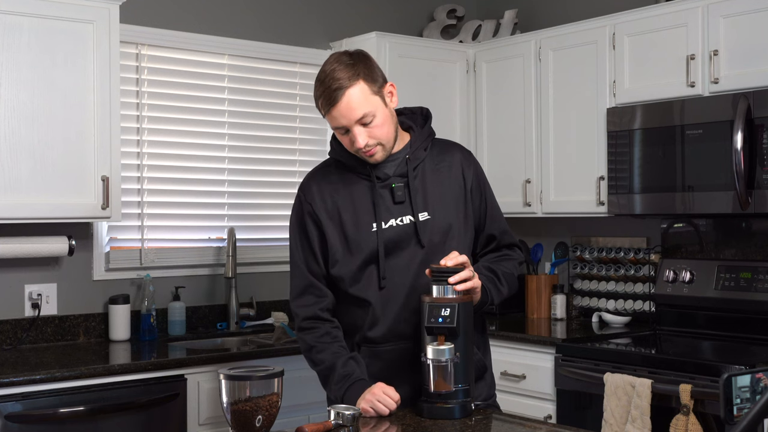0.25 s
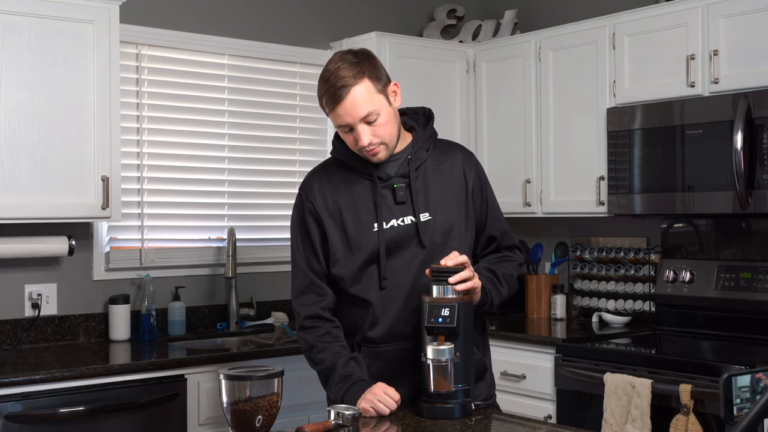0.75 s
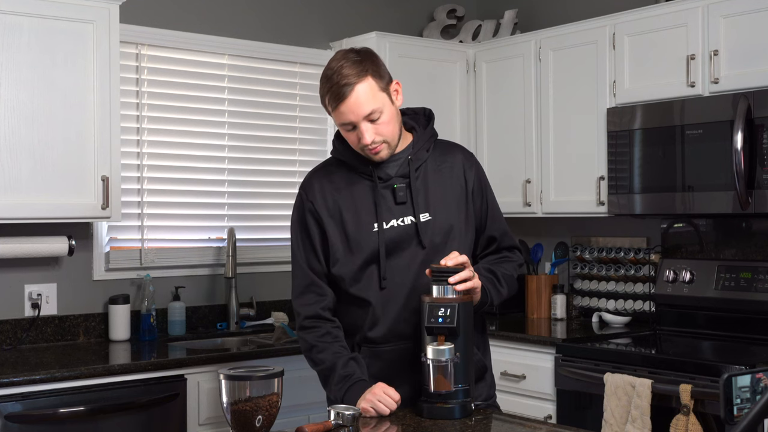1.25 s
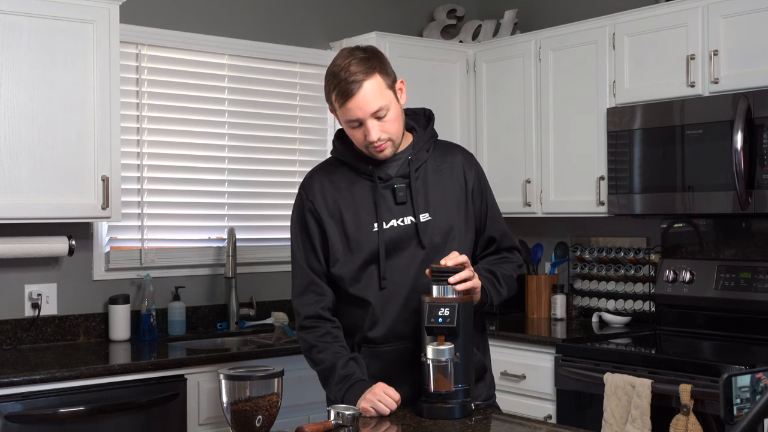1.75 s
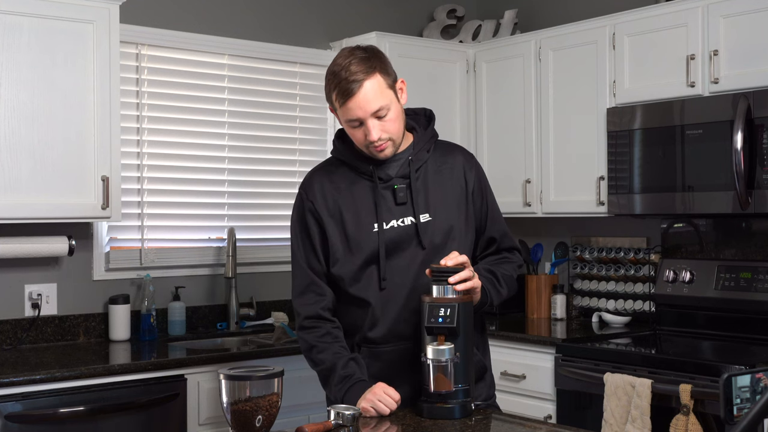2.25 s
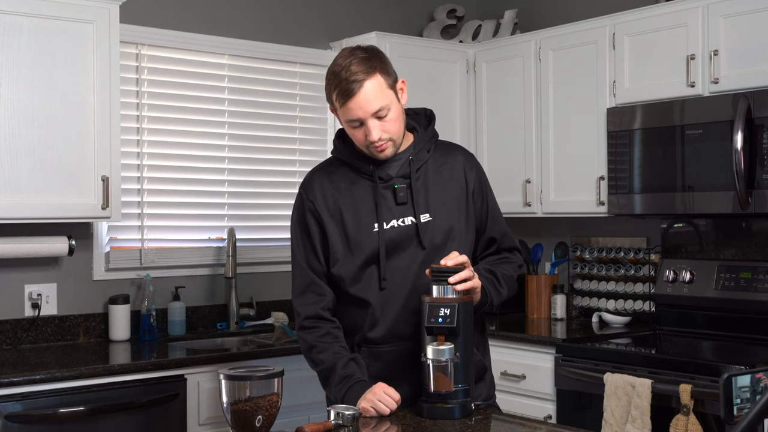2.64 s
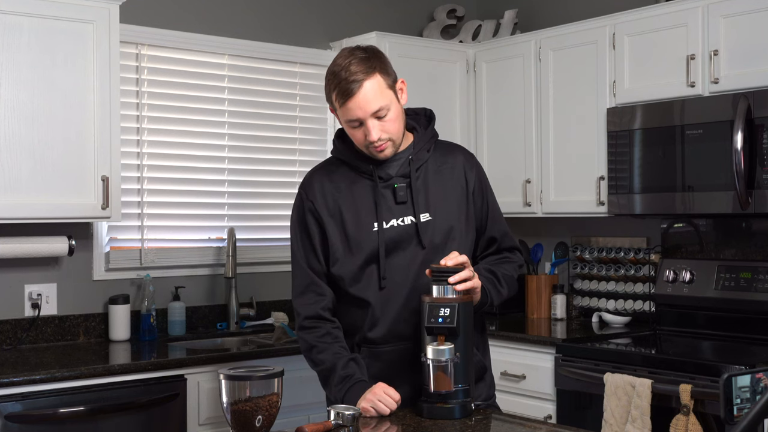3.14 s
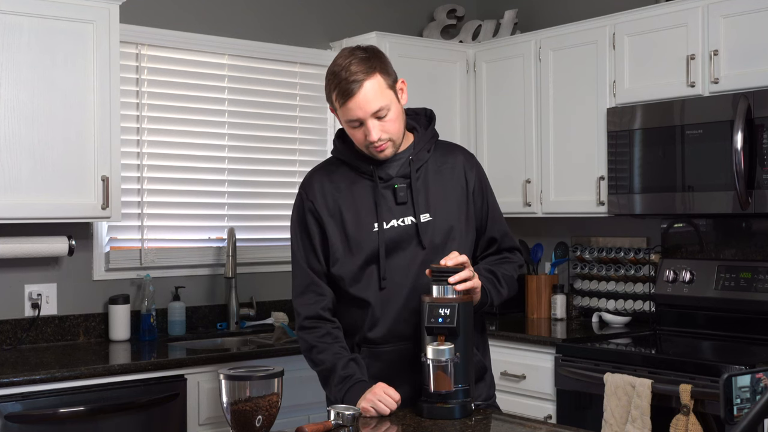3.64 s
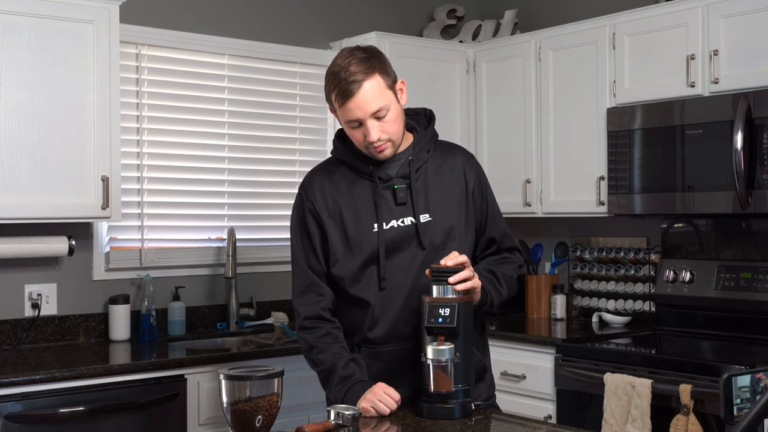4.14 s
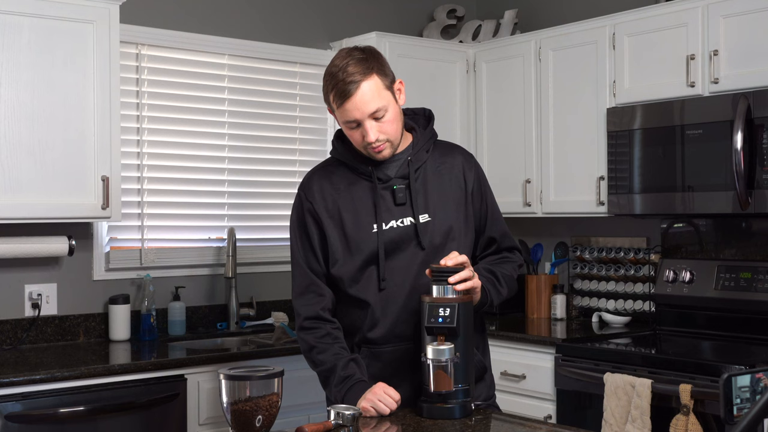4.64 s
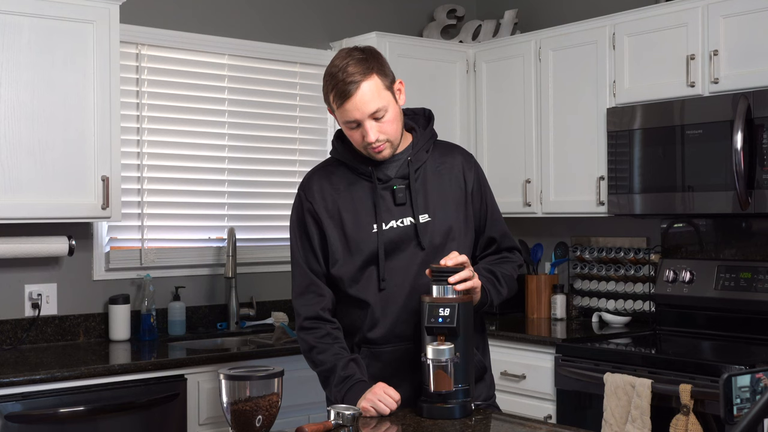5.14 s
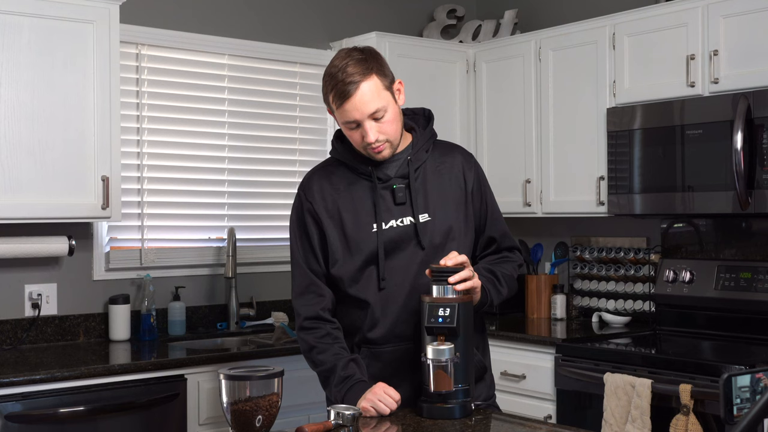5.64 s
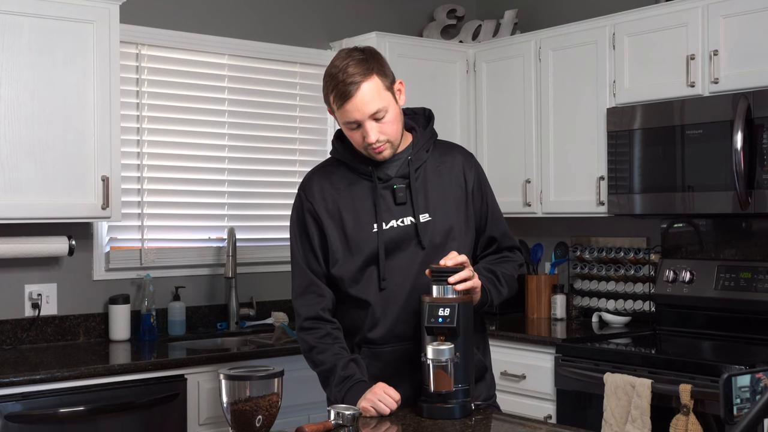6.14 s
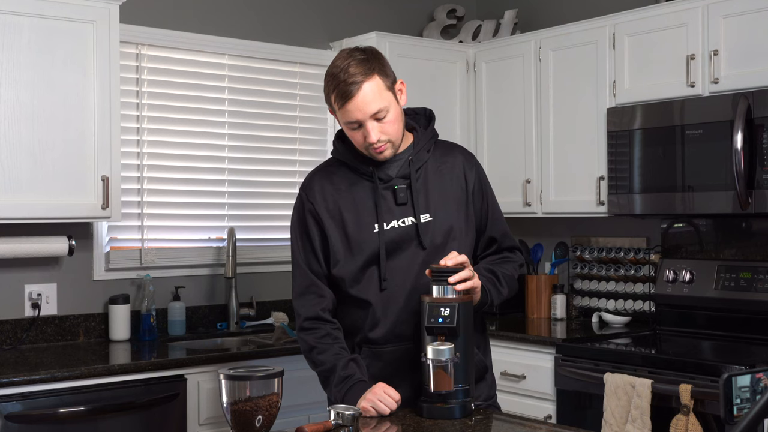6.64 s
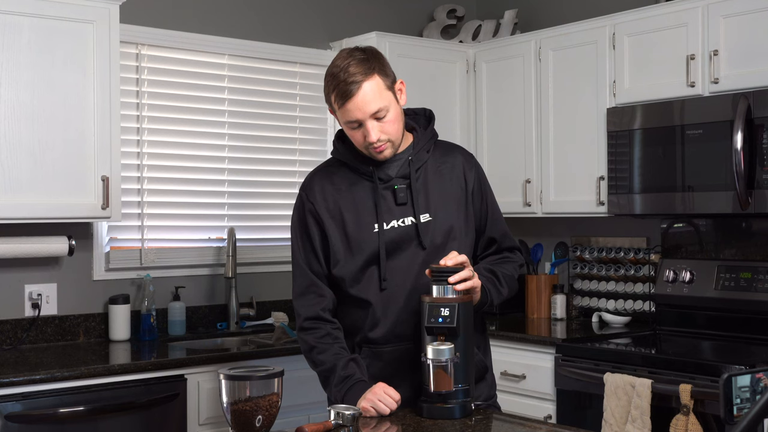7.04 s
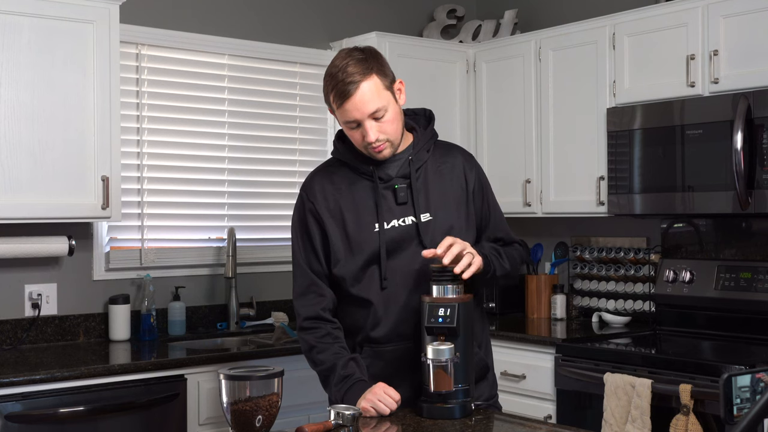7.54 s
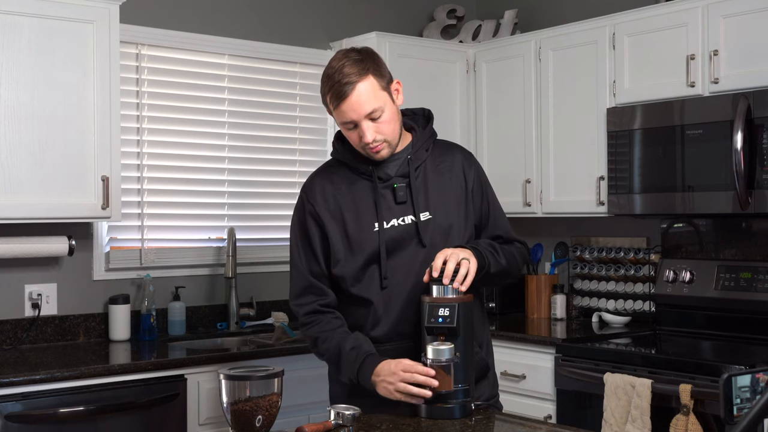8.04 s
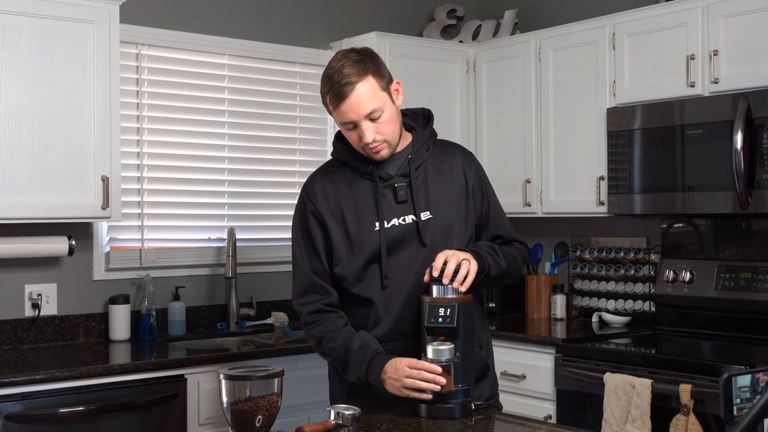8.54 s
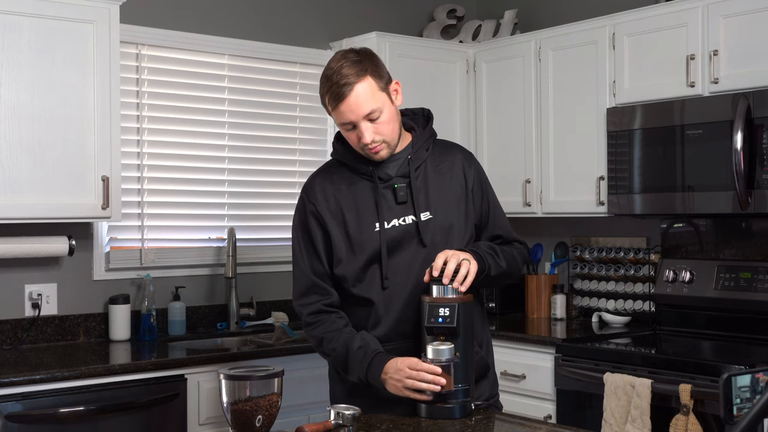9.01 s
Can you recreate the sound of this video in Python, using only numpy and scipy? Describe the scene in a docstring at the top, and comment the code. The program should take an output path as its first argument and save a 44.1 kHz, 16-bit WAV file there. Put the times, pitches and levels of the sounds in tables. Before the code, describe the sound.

Loud, gritty coffee grinding with a wavering gear squeal fades over several seconds into soft motor hum and pattering grounds, ending with a shaken cup.

```python
"""On a kitchen counter, an electric burr grinder chews its last beans and its motor speeds up as the grind thins;
late on, several layers dip in level while the motor runs on, and at the end a hand shakes the catch cup. Beans
crunch as shaped noise bursts and snap as ringing puffs; the gear squeals under load, loudest once a gear turn,
as a wavering tone with noisy side whistles. The motor hums in sines split by the mains ripple. Grounds patter
in the cup as noise bursts, and the room adds a tail."""
import sys
import numpy as np
from scipy import signal
from scipy.io import wavfile
from scipy.ndimage import uniform_filter1d

SR = 44100
rng = np.random.default_rng(int(sys.argv[2]) if len(sys.argv) > 2 else 0)


def inscribe(sig):
    """Save sig as 16-bit PCM at rate SR to the path in sys.argv[1].

    A 1-D sig is mono; a 2-D sig holds one channel per row.
    Samples are clipped to [-1, 1] before scaling.
    """
    pcm = np.round(np.clip(np.atleast_2d(sig).T, -1, 1) * 32767)
    wavfile.write(sys.argv[1], SR, pcm.astype(np.int16))


N = 409136
T = np.arange(N) / SR

# The grind thins as the hopper empties:
# (time [s], squeal [dB], depth of its throb [dB], crunch [dB], chute knocking [dB], fizz [dB])
GRIND = [(0.0, -29.5, 4, -24.5, -36, -42.5), (0.6, -29.5, -0.5, -25.5, -30.5, -46.5),
         (1.2, -28, 1, -26.5, -32, -51.5), (1.7, -30, 6, -29, -31, -58.5),
         (2.1, -31, 9.5, -31, -29.5, -60.5), (2.5, -25.5, 2.5, -32.5, -36.5, -60.5),
         (2.85, -34, 5, -38, -37.5, -61.5), (3.3, -28.5, 7, -39, -43, -62.5),
         (3.6, -32.5, 5.5, -41.5, -44.5, -63.5), (3.95, -39.5, 1, -40.5, -41, -63),
         (4.4, -44, 4, -43, -53, -66), (4.8, -44.5, 8, -45.5, -59, -69), (5.1, -51.5, 5.5, -50, -63, -76),
         (5.5, -45.5, 3.5, -47, -66, -70), (5.9, -55, 11, -56.5, -55, -72),
         (6.2, -53.5, 2, -55.5, -70, -79), (7.0, -58.5, 22, -51, -72, -83)]
# Beans that catch in the burrs and load the gear:
# (time [s], length [s], rise of squeal [dB], rise of crunch [dB], rise of knocking [dB])
BITES = [(0.03, 0.16, 7.5, 1, 9), (0.17, 0.12, 3.5, -1, 5), (0.34, 0.14, 4, -1.5, 4.5),
         (0.54, 0.2, 3.5, 0.5, -2.5), (0.93, 0.018, 8, 1, 4), (1.07, 0.18, 3.5, 0, 2),
         (1.29, 0.16, 6, 0, 1), (1.44, 0.059, 7, -1, -4), (1.54, 0.14, 3.5, 0, 3.5),
         (1.72, 0.24, 4.5, 1.5, 0), (1.9, 0.39, 3, 1, 0), (2.16, 0.079, 6, 2.5, -4.5),
         (2.29, 0.098, -0.5, 1, -3), (2.45, 0.17, 4, -0.5, 3.5), (2.557, 0.013, 4.5, 0, -4),
         (2.62, 0.22, 4.5, -1.5, 2), (2.78, 0.24, 7.5, 1, 4.5), (2.9, 0.095, 4, 3.5, 8),
         (3.03, 0.023, 10, 3, 6), (3.075, 0.017, 4, -1, 1), (3.17, 0.26, 5, 3, 7.5), (3.225, .04, 7, -4, 5),
         (3.31, .025, 3.5, -1.5, 0), (3.345, .03, -3.5, 1, 2), (3.38, 0.21, 3.5, 4.5, 8),
         (3.4, 0.068, 4.5, 0, 1), (3.52, 0.04, 2.5, 3, -7), (3.62, 0.12, 6, 7, 12.5),
         (3.72, 0.2, 10, 3.5, 9), (3.85, 0.28, 10.5, 0.5, 3.5), (3.997, 0.022, 5.5, 4, 1),
         (4.02, 0.17, 3.5, 1.5, -3), (4.035, 0.027, 9, 6, 3), (4.23, 0.048, 5, 1, -8),
         (4.31, 0.22, 7, -1, 7.5), (4.313, .016, 3.5, 1, -1), (4.47, 0.14, 3.5, 5, -4),
         (4.62, 0.33, 7.5, 4.5, 8), (4.92, .12, 3.5, 3, 12), (5.14, 0.16, 5.5, 3.5, 11),
         (5.34, 0.083, -6, 4.5, 18), (5.43, 0.053, 0, 3, 12), (5.77, 0.045, 11.5, 3, -7),
         (5.84, 0.047, 2, 9, -2), (5.91, 0.12, 10, -8, 7), (6.0, 0.049, 21.5, 13, 4),
         (6.08, 0.17, 7.5, 9, 13), (6.37, 0.11, 3.5, 4, 6), (6.53, 0.053, 17.5, -7, -3)]
CRACK_RISE = 0.31  # share of its length in which a bean's crunch and knocking rise
FIZZ_PER_CRUNCH = 0.79  # dB of fizz for each dB that a bean adds to the crunch
# Crunch spectrum: (frequency [Hz], level [dB])
CRUNCH_SPECTRUM = [(35, -60.5), (70, -57.5), (250, -34), (489, -16), (595, -12), (752, -9), (863, -16.5),
                   (1057, -16), (1410, -10), (2350, -18.5), (3090, 3.5), (3540, -17), (4200, -19),
                   (4750, -15), (5340, -47), (6500, -48.5), (8450, -70.5), (14300, -120)]
# Resonances of the housing: (frequency [Hz], width [Hz], lift [dB])
HOUSING_MODES = [(589.4, 38, 9.5), (621, 31, 10), (757.6, 62, 11), (832, 40, -6), (1377, 17, 9),
                 (1710, 25, -1), (1920, 61, 3), (1060, 18, 6), (1277, 51, 4.5), (1430, 26, 6.5),
                 (2045, 180, 7.5)]
# Resonances of the chute: (frequency [Hz], width [Hz], level [dB])
CHUTE_MODES = [(2840, 180, -7.5), (2982, 275, 8), (3460, 240, -2.5)]
# Spectrum of the fine splinters: (frequency [Hz], level [dB])
FIZZ_SPECTRUM = [(2940, -43.5), (5000, -6), (5150, -21.5), (5350, -12.5), (6190, -3.5), (7200, -9),
                 (8020, -19.5), (9190, -5), (9690, -14.5), (10400, -24), (11900, -11), (13400, -17),
                 (14800, -7.5), (15200, -10.5), (16000, -25)]
# Short snaps near 3 kHz, and one faint narrow tick near 5.8 kHz late on: (time [s], peak [dB], ring [Hz])
SNAPS = [(0.1331, -21, 3050), (0.45, -13, 2970), (0.902, -27.5, 2850), (1.021, -13.5, 3080),
         (1.087, -29, 2880), (1.3778, -17, 2910), (2.0785, -18, 3060), (2.1192, -15.5, 3150),
         (2.176, -26, 2950), (2.2797, -12, 2950), (2.3208, -15, 3130), (2.4184, -28, 2900),
         (2.455, -22, 2920), (2.5287, -30.5, 2990), (2.552, -22, 3200), (2.599, -16.5, 2900),
         (2.7227, -24, 2830), (2.8, -16.5, 3000), (2.9008, -16, 3160), (2.9991, -23, 2850),
         (3.1115, -31, 2980), (3.432, -28, 2840), (3.2323, -20, 3060), (3.3332, -35, 3000),
         (3.391, -20, 2960), (3.514, -21, 3210), (3.5886, -26, 2980), (3.707, -35, 2700),
         (3.951, -27, 2760), (4.31, -31, 3080), (4.9665, -26.5, 2940), (5.4222, -30, 2980),
         (5.9746, -27.5, 2810), (6.0833, -33, 2820), (8.9813, -60, 5770)]
# Splinters that tick high: (time [s], peak [dB], centre [Hz])
TICKS = [(0.8984, -41, 14800), (1.1633, -46, 8900), (1.3803, -35, 15200), (1.6062, -57, 13800),
         (1.6516, -48, 13800), (1.8966, -50, 14600), (1.9435, -49, 14300), (2.1924, -57, 8100),
         (2.4668, -51, 9200), (2.5975, -54, 13700), (3.2306, -53, 9100), (3.3353, -43, 15200),
         (3.8417, -52, 9100), (4.0178, -54, 13900), (4.0946, -58, 8310), (4.4099, -61, 8130),
         (4.4752, -52, 9050), (5.1158, -57, 11600), (5.3308, -58, 8680), (5.4121, -66, 9010),
         (5.8356, -66, 14700), (5.9888, -60, 11700), (6.2447, -78, 14100), (6.4113, -67, 8870),
         (6.4981, -69, 9370), (6.8364, -56, 8160), (7.0723, -53, 8150), (7.2205, -56, 8050),
         (7.3587, -54, 8100), (7.6211, -63, 8170), (7.7962, -62, 12200), (8.1294, -72, 8340)]
# Beans that thud against the housing: (time [s], peak [dB], ring [Hz])
THUDS = [(0.069, -23, 764), (0.278, -26.5, 750), (0.546, -26, 606), (0.618, -28, 750), (0.679, -27.5, 600),
         (1.032, -25.5, 725), (1.121, -25.5, 664), (1.184, -24, 750), (1.383, -24, 1380),
         (1.464, -18.5, 720), (1.585, -24.5, 1605), (1.691, -25, 727), (1.805, -28, 614),
         (1.84, -26.5, 740), (1.873, -31, 740), (2.019, -26.5, 640), (2.045, -28.5, 644),
         (2.119, -28.5, 633), (2.187, -30.5, 1570), (2.427, -30.5, 751), (2.551, -33, 744),
         (2.701, -35.5, 724), (2.841, -31, 654), (2.998, -31.5, 620), (3.058, -31.5, 616),
         (3.513, -30, 630), (3.611, -34, 1420), (3.665, -30, 614)]

# Motor speed: (time [s], speed [turns per second])
SHAFT_SPEED = [(0.0, 83.49), (0.5, 85.05), (1.0, 84.85), (1.5, 85.21), (2.0, 86.07), (2.5, 86.36),
               (3.0, 87.25), (3.5, 86.96), (4.0, 87.08), (5.0, 88.46), (6.0, 88.84), (6.4, 88.95),
               (7.0, 89.33), (9.28, 89.46)]
GEAR_RATIO, TEETH = 3, 56  # motor turns in one gear turn, gear teeth
THROB_LAG = .46  # gear turns
LOAD_SAG, FULL_LOAD_DB = .004, -26  # share by which the teeth slow down at this squeal level
# Side whistles of the gear: (multiple of the tooth rate [1], width [Hz])
SIDE_WHISTLES = [(1, 20), (3, 47)]
# Side whistles against the main squeal: (time [s], lower [dB], upper [dB])
SIDE_LEVELS = [(0, -10, -17.5), (1.001, -16.5, -15), (2, -13.5, -17.5), (2.501, -28.5, -28),
               (3, -29, -29.5), (4.001, -26.5, -28.5), (5.001, -14, -26.5), (7, -24, -31.5)]

RIPPLE_HZ = 120.05  # mains ripple in the motor's pull
HALF_RIPPLE = 0.75  # the mains half waves pull unevenly: ripple at half the rate, as a share of the full one
RIPPLE_DB = -78  # the ripple's own hum tone
# Motor levels: (time [s], low tones [dB], overtones of the mains hum [dB], upper tones [dB])
MOTOR_LEVELS = [(0.0, -56, -81, -59), (1.1, -59, -91, -64), (1.9, -61.5, -82.5, -63),
                (3.05, -61.5, -78, -48), (4.4, -64, -73.5, -55.5), (6.25, -66, -78, -56),
                (6.5, -65.5, -79, -56.5), (7.4, -70.5, -74, -58.5), (8.2, -74.5, -80.5, -60),
                (9.28, -79, -85, -65.5)]
# Low motor tones that shake the counter: (multiple of the speed [1], level [dB], share of ripple [1])
LOW_ORDERS = [(1, -27, 0.088), (2, -11, 0.071), (3, -4, 0.12), (4, -6, 0.27), (5, -6.5, .2),
              (6, -11.5, 0.22)]
# Upper motor tones that buzz: (multiple of the speed [1], level [dB], share of ripple [1])
UPPER_ORDERS = [(7, -3, 0.1), (8, -3.5, .2), (10, -13, 0.25), (11, -19, .3), (12, -14.5, 0.36),
                (16, -22, 0.49)]
# Mains hum tones: (multiple of the ripple [1], level [dB])
HUM_ORDERS = [(2, 0), (2.5, -5), (4, 4.5), (4.5, 3.5), (5.5, 10.5), (6.5, 18.5), (7.5, 5), (9, 6.5),
              (10, 9)]
# Two thin tones that come and go:
# (time [s], one ripple above the 14th multiple of the speed [dB], on the 14th multiple [dB])
THIN_LEVELS = [(4.1, -59, -76), (4.59, -59, -63), (4.84, -68, -68), (5.49, -64, -64), (5.83, -70, -73),
               (6.03, -59, -61), (6.12, -60, -69), (6.15, -66, -85), (6.19, -64, -66), (6.27, -63, -66),
               (6.93, -74, -69), (7.02, -58, -69), (7.36, -85, -78), (7.43, -68, -71), (7.73, -77, -69),
               (7.79, -72, -75), (8.01, -65, -67), (8.08, -85, -67), (8.26, -65, -79), (8.47, -61, -79),
               (8.54, -80.5, -85), (8.92, -60, -84), (9.03, -82, -71), (9.1, -84, -83)]
THIN_WAVER_DB = 1.5
COMPANION_DB = -12  # a fainter tone one more ripple higher, against the tone above the 14th multiple
BELOW_DB = -9.5  # another, one ripple below the 14th multiple, against the same tone
# Bare motor noise: (frequency [Hz], level [dB])
IDLE_SPECTRUM = [(35, -99), (70, -62), (130, -31.5), (488, -12.5), (628, -7), (700, -5), (1390, -15),
                 (2200, -17), (2800, -21.5), (3600, -33), (4300, -45), (6000, -58), (9000, -62),
                 (14000, -92)]
# Bare motor noise: (time [s], level [dB])
IDLE_LEVELS = [(6.0, -52), (6.17, -52), (6.26, -71), (8.1, -73), (8.2, -54.5), (8.6, -56.5), (9.1, -58.5),
               (9.28, -46)]

# The empty burrs: (time [s], whirr [dB])
WHIRR_LEVELS = [(3.5, -42), (4.2, -53), (5.4, -51), (5.9, -52), (6.4, -50), (7.64, -47), (8.2, -52.5),
                (8.44, -49), (8.56, -57), (9.28, -56)]
# Whirr spectrum: (frequency [Hz], level [dB])
WHIRR_SPECTRUM = [(35, -87), (70, -54.5), (108, -42), (200, -32.5), (290, -26.5), (380, -15), (508, -13),
                  (770, -4), (850, -8), (1240, -13), (1550, -17), (2020, -13.5), (2680, -17.5), (3300, -17),
                  (3700, -14), (4300, -29), (5500, -33.5), (7150, -68), (12100, -100)]
# Resonances of the burrs: (frequency [Hz], width [Hz], lift [dB])
BURR_MODES = [(635, 58, 1.5), (750, 12.5, 10.5), (837, 30, -5.5), (940, 34, -7.5), (2240, 150, 4.5),
              (3530, 460, 4.5)]
# A hollow ring in the whirr sinks and returns while the hand leaves the lid:
# (time [s], frequency [Hz], level against the whirr [dB])
HOLLOW = [(6.2, 2140, -30), (6.7, 2130, -12), (7.1, 2080, -9.5), (7.45, 1950, -10.5), (7.7, 2010, -8.5),
          (8.2, 1965, -11), (8.6, 2010, -10.5)]
HOLLOW_WIDTH_HZ = 170
# Grounds that trickle into the cup: (time [s], level [dB])
TRICKLE_LEVELS = [(4.0, -65), (4.8, -62), (5.17, -59.5), (5.4, -62.5), (6.25, -67), (6.8, -61),
                  (7.64, -58.5), (8.2, -66), (9.28, -67)]
# Patter spectrum: (frequency [Hz], level [dB])
PATTER_SPECTRUM = [(1760, -22.5), (3000, -22), (3620, 0), (4080, -6), (4860, -9.5), (6260, -9), (7300, -11),
                   (8280, -17.5), (9070, -24.5), (14800, -28.5), (16000, -39.5)]
# Resonances of the cup under the patter: (frequency [Hz], width [Hz], lift [dB])
CUP_MODES = [(6060, 120, 7), (5990, 190, 5.5), (8330, 270, 10.5), (10420, 170, 3), (12100, 250, 4.5),
             (14500, 200, 5.5)]
# Falling grounds make the cup wall sing in spells: (time [s], length [s], rise above the steady singing [dB])
SINGING_SPELLS = [(4.4, .2, 19), (4.71, 0.3, 22), (5.16, 0.35, 22), (5.6, 0.76, 17), (6.05, .15, 16),
                  (6.57, .1, 4), (6.88, 0.5, 24), (7.09, 0.074, 16), (7.22, .06, 28.5), (7.46, 0.38, 31),
                  (7.57, 0.088, 18.5), (7.8, 0.13, 19)]
SINGING_DB, SINGING_FROM_S, SINGING_TO_S = -85, 3.1, 7.6  # faint steady singing
# Singing cup wall: (frequency [Hz], width [Hz], level [dB])
WALL_MODES = [(6400, 180, 2), (7640, 100, -12), (8180, 120, 4), (10900, 150, -11)]
# The cup is shaken: (time [s], level [dB], share of treble above the cup's body [0-1])
SHAKE = [(9.03, -75, .0), (9.05, -60, 0.5), (9.08, -54, .1), (9.09, -45, 0), (9.125, -41.5, 0.95),
         (9.135, -38, 0.54), (9.165, -42.5, .85), (9.22, -37.5, 0.82), (9.25, -40, 1), (9.28, -37.5, 0.9)]
# Spectrum of the shaken cup: (frequency [Hz], level [dB])
SHAKEN_SPECTRUM = [(88, -86), (150, -56), (354, -19), (545, -22), (650, 1), (1450, -25), (1870, 2.5),
                   (2650, -8.5), (3700, -6.5), (4670, -18), (6140, -9), (8000, -20), (10200, -47),
                   (11500, -31), (13300, -52), (15000, -32), (16000, -39)]
# Resonances of the loose cup: (frequency [Hz], width [Hz], lift [dB])
RATTLE_MODES = [(3900, 240, 6), (8460, 490, 12), (10700, 150, 11), (12100, 500, 15), (14600, 500, 10)]
# Crumbs and, at the end, knocks that strike the cup: (time [s], peak [dB], upper rings against the lower [dB])
CRUMBS = [(8.4433, -59, 0), (8.4842, -57, 0), (8.5046, -66, -3), (8.561, -59, 0), (8.6128, -61, 0),
          (8.6383, -64, -2), (8.6692, -63, 2), (8.6957, -64, 1), (8.7505, -65, -3), (8.771, -66, -2),
          (8.8004, -67, 2.5), (8.9007, -65, 4.5), (8.9541, -66, 3), (9.0104, -51, 8), (9.0374, -53, -1),
          (9.0459, -54, -7), (9.0628, -53, 8), (9.0808, -42, 2), (9.0858, -37, 4), (9.104, -42, 6),
          (9.1266, -31, 2), (9.14, -42, 4), (9.1711, -40, -5), (9.188, -34, -2), (9.2135, -35, 4),
          (9.222, -33, 0), (9.268, -36, 0)]
# Lower rings of the struck cup: (frequency [Hz], width [Hz], level [dB])
CUP_LOW_MODES = [(740, 120, -8), (1910, 210, 0), (2300, 420, -1)]
# Upper rings of the struck cup: (frequency [Hz], width [Hz], level [dB])
CUP_HIGH_MODES = [(2850, 300, -5), (3570, 320, -0.5), (3800, 370, 7.5), (6150, 1200, -27)]

# Several layers dip in level until the cup is shaken, while the motor keeps its speed:
# (fall from [s], fall to [s], return from [s], return to [s])
DIP_TIMES = (8.24, 8.55, 9.0, 9.15)
DIP_LOW_DB, DIP_HUM_DB, DIP_IDLE_DB, DIP_WHIRR_DB, DIP_TRICKLE_DB = -4.5, -10.5, -7.5, -17.5, -19
# Decay of the kitchen: (frequency [Hz], time to fall by 60 dB [s])
KITCHEN_DECAY = [(200, 0.025), (2000, 0.21), (12000, 0.16)]
EDGE_HZ = 15750  # top of the band


def gain_of(db):
    """Decibels to a factor."""
    return 10 ** (np.asarray(db) / 20)


def evened(x):
    """Scales to rms 1."""
    return x / np.sqrt(np.mean(x ** 2) + 1e-20)


def read(points, hz):
    """Reads a spectrum on a log-frequency axis."""
    f, value = np.transpose(points)
    return np.interp(np.log(hz + 1), np.log(f + 1), value)


def curves(rows):
    """Draws one automation curve per column, for every sample."""
    s, *columns = np.transpose(rows)
    return [np.interp(T, s, c) for c in columns]


def swells(rows, rise=0.54):
    """Each row adds a smooth rise and fall in dB round its time; one array per column."""
    s, length, *columns = np.transpose(rows)
    coarse = T[::64]
    u = (coarse[:, None] - s) / length + .5  # 0 to 1 through each swell
    ramp = np.clip(np.minimum(u / rise, (1 - u) / (1 - rise)), 0, 1)
    shape = np.sin(np.pi / 2 * ramp) ** 2
    return [np.interp(T, coarse, shape @ db) for db in columns]


def slow(hz):
    """Smooth random drift of rms 1, low-passed at hz."""
    return evened(signal.sosfilt(signal.butter(2, hz, fs=SR, output="sos"), rng.standard_normal(N)))


def dip(db, returns=True):
    """Gain of a layer that sinks by db late on, and then returns or stays down."""
    return gain_of(db * np.interp(T, DIP_TIMES, [0, 1, 1, 0 if returns else 1]))


def ripple(depth):
    """The motor's pull rises and falls with the mains."""
    return 1 + depth * (np.cos(2 * np.pi * RIPPLE_HZ * T) + HALF_RIPPLE * np.cos(np.pi * RIPPLE_HZ * T))


def resonate(x, hz, width):
    """Shifts hz (a number or a curve) down to zero, smooths, and shifts back: a resonance of gain 1."""
    turn = np.exp(2j * np.pi * np.cumsum(hz * np.ones(len(x))) / SR)
    r = np.exp(-np.pi * width / SR)
    return 2 * (turn * signal.lfilter([1 - r], [1, -r], x / turn)).real


def resonate_twice(x, hz, width, second_width=None):
    """Two resonances in a row give steeper skirts; both have the same width unless a second is given."""
    return resonate(resonate(x, hz, width), hz, second_width or width)


def colour(x, spectrum, modes=()):
    """Causal filter: a smooth spectrum with resonant bumps on it; the result has rms 1."""
    hz = abs(np.fft.fftfreq(8192, 1 / SR))
    db = read(spectrum, hz) + sum(lift / (1 + (2 * (hz - f) / width) ** 2) for f, width, lift in modes)
    log_gain = np.log(gain_of(np.maximum(db - db.max(), -100)))
    taps = np.fft.ifft(np.exp(np.conj(signal.hilbert(log_gain)))).real[:4096]  # minimum phase
    return evened(signal.oaconvolve(x, taps)[:N])


def grit(per_s, spread_db, burst_s, bed):
    """Short bursts of noise of uneven size, with a soft start, over an even bed of noise."""
    sizes = gain_of(spread_db * np.minimum(rng.exponential(1, N), 4))
    hits = sizes * (rng.random(N) < per_s / SR)
    decay = np.exp(-1 / (burst_s * SR))
    bursts = signal.lfilter([1], [1, -decay], uniform_filter1d(hits, size=130))
    return (bed + evened(bursts)) * rng.standard_normal(N)


def scattered(spectrum, modes, edges_hz, shared, **grain):
    """Particles differ in pitch: every band gets bursts of its own, and some bursts span all bands."""
    bands = [signal.sosfilt(signal.butter(2, e, "band", fs=SR, output="sos"), grit(**grain))
             for e in zip(edges_hz, edges_hz[1:])]
    return colour(sum(bands) + shared * grit(**grain), spectrum, modes)


def beans(level_db, rise_db):
    """Cracking beans shake the housing, knock in the chute and throw off fine splinters."""
    crunch_db, knock_db = level_db[0] + rise_db[0], level_db[1] + rise_db[1]
    fizz_db = level_db[2] + FIZZ_PER_CRUNCH * rise_db[0]
    crunch = scattered(CRUNCH_SPECTRUM, HOUSING_MODES, [40, 680, 1150, 1750, 2500, 3500, 4300, 8000],
                       shared=0.67, per_s=110, spread_db=4.5, burst_s=0.004, bed=1.64)
    knocks = grit(per_s=150, spread_db=0.0, burst_s=0.00043, bed=1.0)
    knock = evened(sum(gain_of(db) * resonate_twice(knocks, f, w) for f, w, db in CHUTE_MODES))
    fizz = scattered(FIZZ_SPECTRUM, [], np.linspace(4500, 16500, num=13),
                     shared=.7, per_s=53, spread_db=5.0, burst_s=0.011, bed=0.62)
    return gain_of(crunch_db) * crunch + gain_of(knock_db) * knock + gain_of(fizz_db) * fizz * ripple(0.13)


def blows(rows, t60, click_db, spread_hz):
    """Each blow is a puff of noise that rings briefly round its pitch, with a fainter wide click."""
    out, t = np.zeros(N + 2000), np.arange(2000) / SR
    for (s, db, hz), puff in zip(rows, rng.standard_normal((len(rows), 2000))):
        puff = puff * gain_of(-60 * t / t60) * np.minimum(t / 0.0002, 1)
        ring = resonate_twice(puff, hz, spread_hz)
        click = resonate_twice(puff, hz, 3000)
        blow = ring / abs(ring).max() + gain_of(click_db) * click / abs(click).max()
        out[round(s * SR):][:2000] += gain_of(db) * blow
    return out[:N]


def gear(speed, turns, level_db, depth_db):
    """Tooth contact: a wavering squeal at twice the tooth rate with fuzzy side whistles, loud once a gear turn."""
    tooth_hz = speed / GEAR_RATIO * TEETH * (1 - LOAD_SAG * gain_of(level_db - FULL_LOAD_DB))
    rub = rng.standard_normal(N)
    wavering_hz = 2 * tooth_hz + 26 * slow(hz=72)
    sung = np.sin(2 * np.pi * np.cumsum(wavering_hz) / SR) * gain_of(0.48 * slow(hz=39.7))
    squeal = evened(sung) + .5 * evened(resonate_twice(rub, 2 * tooth_hz, 90, 150))
    for db, (k, width) in zip(curves(SIDE_LEVELS), SIDE_WHISTLES):
        squeal += gain_of(db) * evened(resonate_twice(rub, k * tooth_hz, width, 4 * width))
    throb = gain_of(depth_db * np.cos(2 * np.pi * (turns / GEAR_RATIO + THROB_LAG)))
    throb /= np.sqrt(np.i0(depth_db * np.log(10) / 10))  # the throb keeps its mean power
    return gain_of(level_db) * evened(squeal * ripple(0.12)) * throb


def motor_stack(orders, turns):
    """Sines on multiples of the motor speed, each with its own share of mains ripple."""
    return sum(gain_of(db) * ripple(share) * np.sin(2 * np.pi * (k * turns + rng.random()))
               for k, db, share in orders)


def thin_tones(turns):
    """Sines on the 14th multiple of the speed and one or two ripples beside it, wavering in level."""
    above_db, on_db = (db + THIN_WAVER_DB * slow(hz=1.7) * (T < DIP_TIMES[0]) for db in curves(THIN_LEVELS))
    slots, mains = 2 * np.pi * 14 * turns, 2 * np.pi * RIPPLE_HZ * T  # phases
    beside = np.sin(slots + mains)
    beside += gain_of(COMPANION_DB) * np.sin(slots + 2 * mains)
    beside += gain_of(BELOW_DB) * np.sin(slots - mains)
    return (gain_of(above_db) * beside + gain_of(on_db) * np.sin(slots)) * np.clip(T - 4.1, 0, 1)


def motor(turns):
    """Clean tones follow the speed, mains hum stands at a fixed pitch, and bare noise joins late."""
    low_db, hum_db, upper_db = curves(MOTOR_LEVELS)
    tones = gain_of(low_db) * dip(DIP_LOW_DB) * motor_stack(LOW_ORDERS, turns)
    tones += gain_of(upper_db) * motor_stack(UPPER_ORDERS, turns)
    overtones = sum(gain_of(db) * np.sin(2 * np.pi * k * RIPPLE_HZ * T) for k, db in HUM_ORDERS)
    hum = gain_of(hum_db) * overtones + gain_of(RIPPLE_DB) * np.sin(2 * np.pi * RIPPLE_HZ * T)
    idle = colour(grit(per_s=54, spread_db=5.0, burst_s=0.0036, bed=3.6), IDLE_SPECTRUM, BURR_MODES[:4])
    idle *= np.clip(T - 5.5, 0, 1) * gain_of(curves(IDLE_LEVELS)[0]) * dip(DIP_IDLE_DB)
    return np.sqrt(2) * (tones + dip(DIP_HUM_DB) * hum + thin_tones(turns)) + idle


def empty_burrs():
    """Burrs without beans whirr: dense grit through their resonances, with a gliding hollow ring."""
    whirr = colour(grit(per_s=110, spread_db=1.5, burst_s=0.0028, bed=3.3), WHIRR_SPECTRUM, BURR_MODES)
    whirr *= np.clip(T - 3.1, 0, 1)
    hollow_hz, hollow_db = curves(HOLLOW)
    air = resonate_twice(rng.standard_normal(N), hollow_hz, HOLLOW_WIDTH_HZ)
    whirr = (whirr + gain_of(hollow_db) * evened(air)) * ripple(0.098)
    return gain_of(curves(WHIRR_LEVELS)[0]) * dip(DIP_WHIRR_DB, returns=False) * whirr


def falling_grounds():
    """Grounds patter into the cup as scattered bursts and make its wall sing in narrow bands."""
    patter = scattered(PATTER_SPECTRUM, CUP_MODES, np.linspace(2500, 16500, num=9),
                       shared=0.33, per_s=83, spread_db=0.0, burst_s=0.017, bed=0.58)
    trickle = gain_of(curves(TRICKLE_LEVELS)[0]) * dip(DIP_TRICKLE_DB, returns=False) * patter
    taps = grit(per_s=110, spread_db=7.5, burst_s=0.0066, bed=0.95)
    wall = evened(sum(gain_of(db) * resonate_twice(taps, f, w) for f, w, db in WALL_MODES))
    spells = gain_of(SINGING_DB + swells(SINGING_SPELLS)[0]) * (T > SINGING_FROM_S) * (T < SINGING_TO_S)
    return (trickle + spells * wall) * ripple(0.33)


def shaken_cup():
    """The shaken cup rattles: dense grit through loose resonances, with treble that comes and goes."""
    grains = grit(per_s=250, spread_db=2.0, burst_s=0.0037, bed=0.95)
    rattle = colour(grains, SHAKEN_SPECTRUM, RATTLE_MODES + BURR_MODES)
    dull = signal.sosfilt(signal.butter(4, 6500, fs=SR, output="sos"), rattle)
    shake_db, bright = curves(SHAKE)
    return gain_of(shake_db) * (T > SHAKE[0][0]) * (dull + np.clip(bright, 0, 1) * (rattle - dull))


def cup_rings(puff, modes):
    """Rings a group of cup modes with one puff."""
    return sum(gain_of(db) * resonate_twice(puff, f, w) / np.sqrt(w) for f, w, db in modes)


def crumbs():
    """Each contact is a very short puff that rings the modes of the cup."""
    out, t = np.zeros(N + 1500), np.arange(1500) / SR
    for (s, db, upper_db), puff in zip(CRUMBS, rng.standard_normal((len(CRUMBS), 1500))):
        puff = puff * gain_of(-60 * t / 0.009) * np.minimum(t / 0.00044, 1)
        ring = cup_rings(puff, CUP_LOW_MODES) + gain_of(upper_db) * cup_rings(puff, CUP_HIGH_MODES)
        out[round(s * SR):][:1500] += gain_of(db) * ring / abs(ring).max()
    return out[:N]


def kitchen(x):
    """Room tail: sparse taps of random sign, each band dying at its own speed."""
    taps, at = np.zeros(SR // 2), np.arange(200, SR // 2 - 20, 20)
    taps[at + rng.integers(0, 20, len(at))] = rng.choice([-1., 1.], len(at))
    hz, t, z = signal.stft(taps, SR, nperseg=256)
    decay = gain_of(-60 * t / read(KITCHEN_DECAY, hz)[:, None])
    tail = signal.istft(z * decay, SR, nperseg=256)[1]
    return signal.fftconvolve(x, tail / np.linalg.norm(tail))[:N]


def scene():
    """Mixes all layers; the load layers fade out once the burrs are empty, and the motor stays dry."""
    speed = curves(SHAFT_SPEED)[0]
    turns = np.cumsum(speed) / SR
    squeal_db, depth_db, *bean_db = curves(GRIND)
    squeal_rise_db = swells(BITES)[0]
    bean_rise_db = swells(BITES, CRACK_RISE)[1:]
    load = beans(bean_db, bean_rise_db) + gear(speed, turns, squeal_db + squeal_rise_db, depth_db)
    hits = blows(SNAPS, t60=0.02, spread_hz=254, click_db=-35.5)
    hits += blows(TICKS, t60=0.05, spread_hz=1100, click_db=-6.5)
    hits += blows(THUDS, t60=0.035, spread_hz=118, click_db=-31.5)
    rough = np.clip((6.9 - T) / 0.63, 0, 1) * load + hits
    rough += empty_burrs() + falling_grounds() + shaken_cup() + crumbs()
    return (motor(turns) + rough + gain_of(-13.5) * kitchen(rough))[None]


def record(dry):
    """The microphone drops the deep bass; then the band limit."""
    thinned = signal.sosfilt(signal.butter(2, 75, "high", fs=SR, output="sos"), dry)
    band_limit = signal.firwin(511, EDGE_HZ, window=("kaiser", 9), fs=SR)
    return signal.oaconvolve(thinned, band_limit[None], "same")


dry = scene()
out = record(dry)
inscribe(out)
```